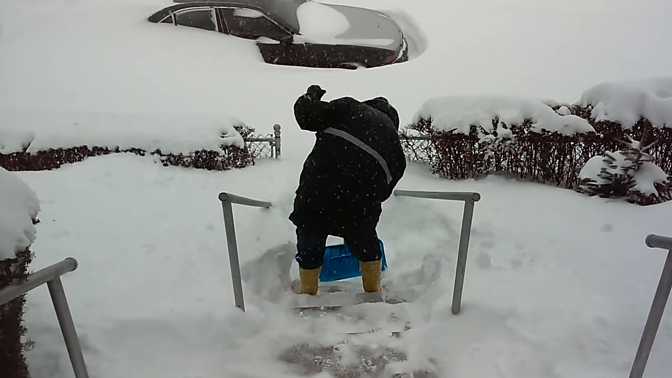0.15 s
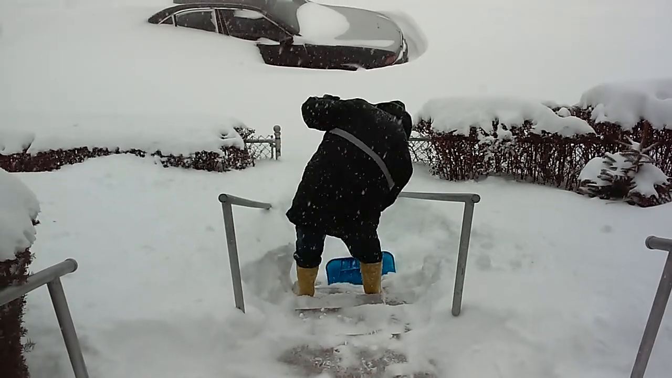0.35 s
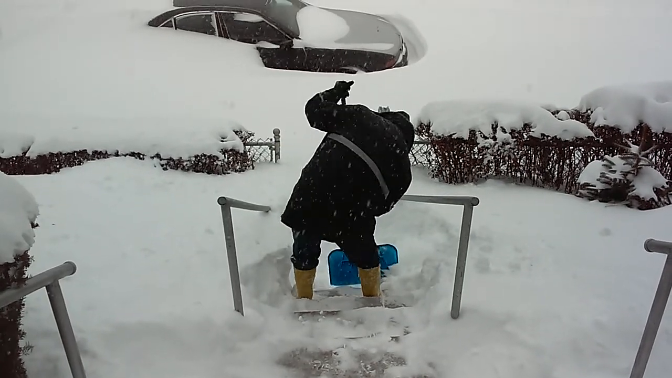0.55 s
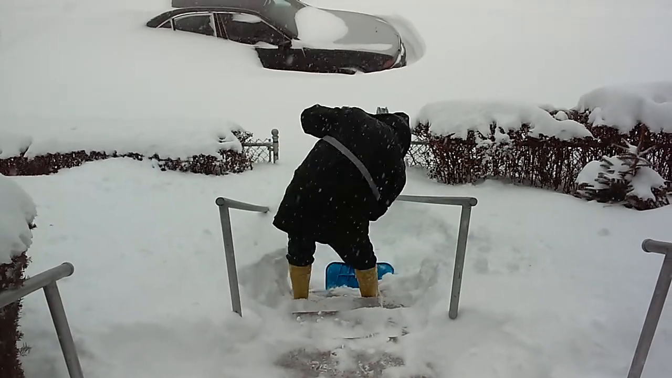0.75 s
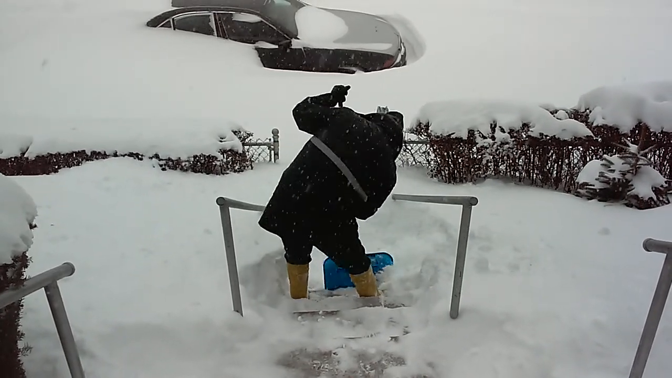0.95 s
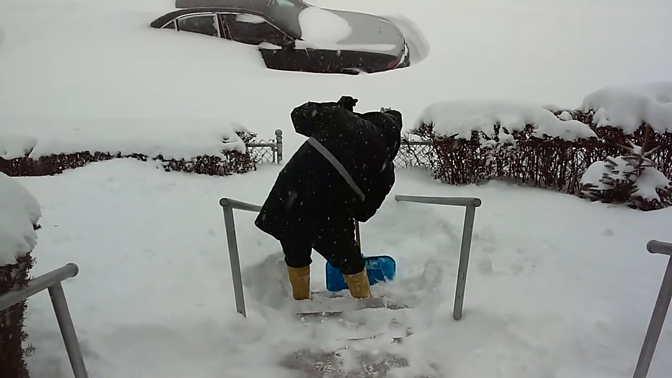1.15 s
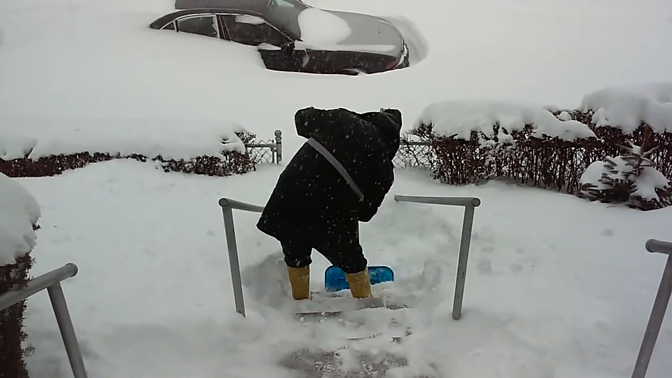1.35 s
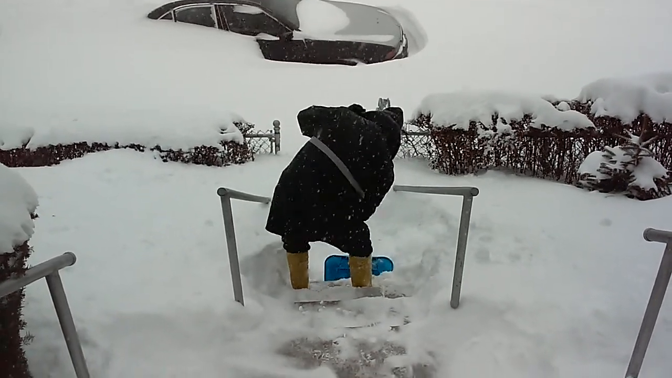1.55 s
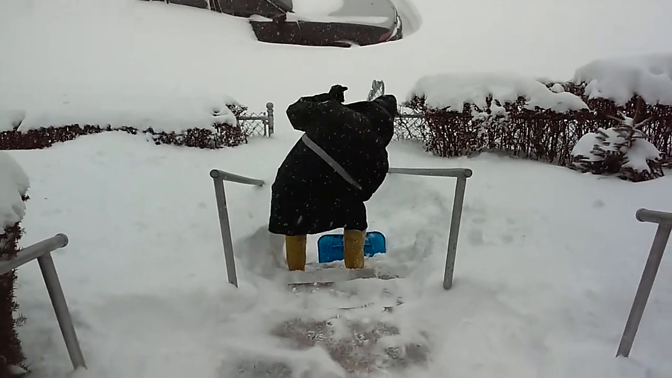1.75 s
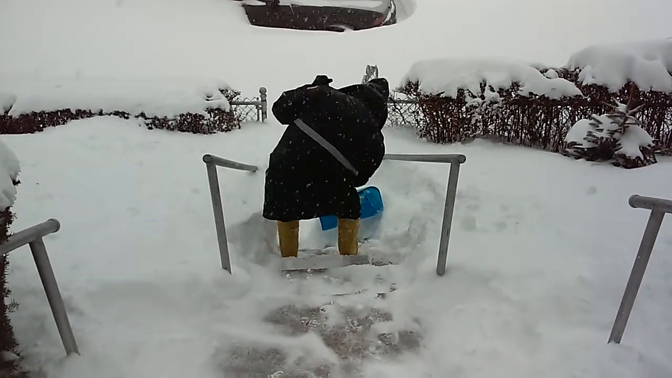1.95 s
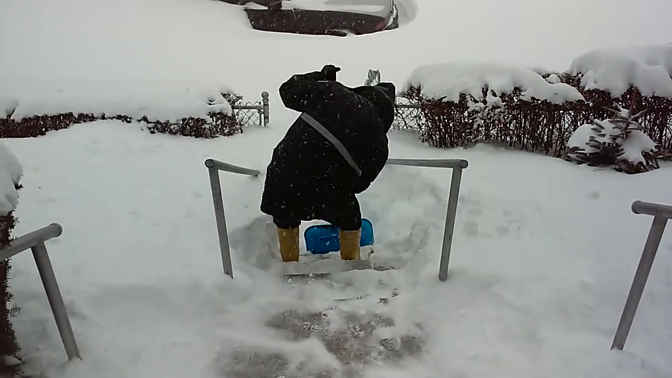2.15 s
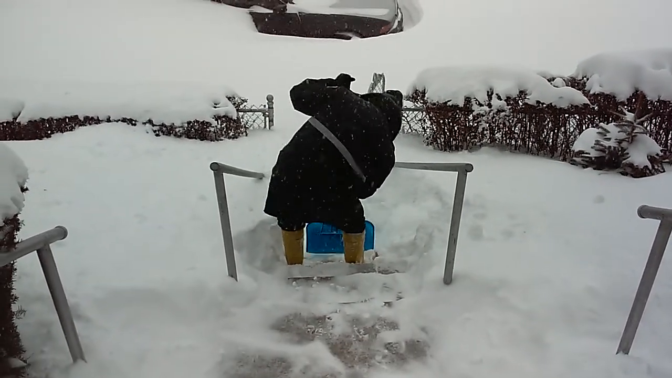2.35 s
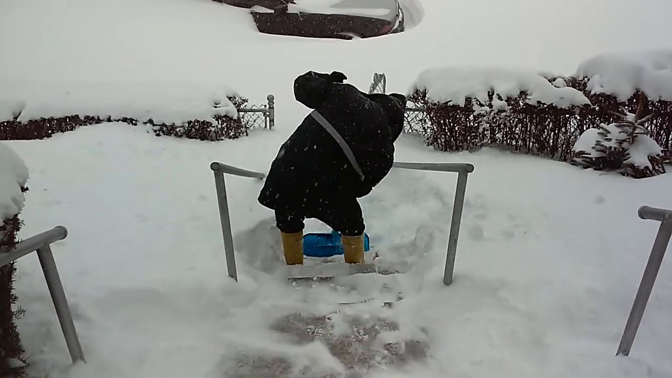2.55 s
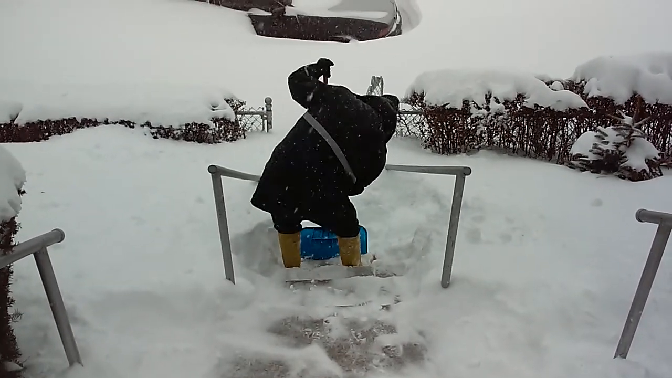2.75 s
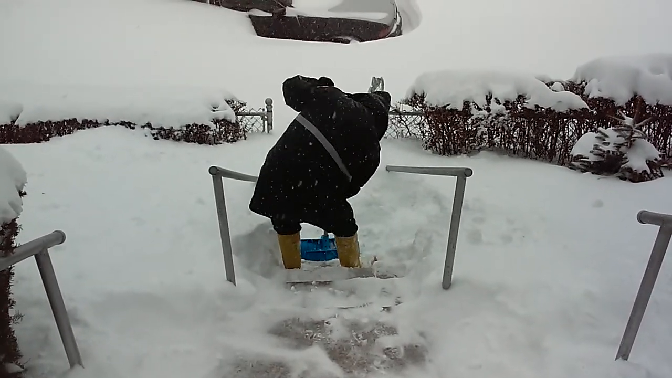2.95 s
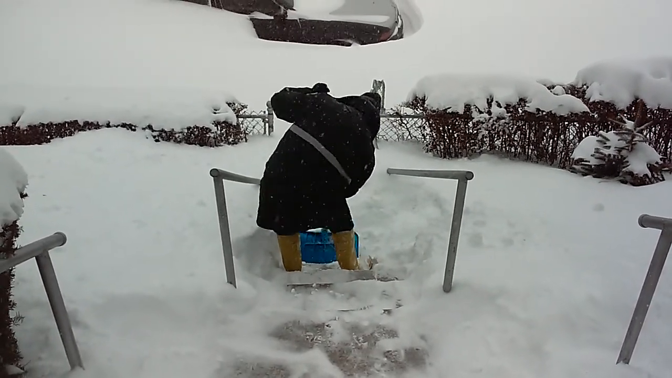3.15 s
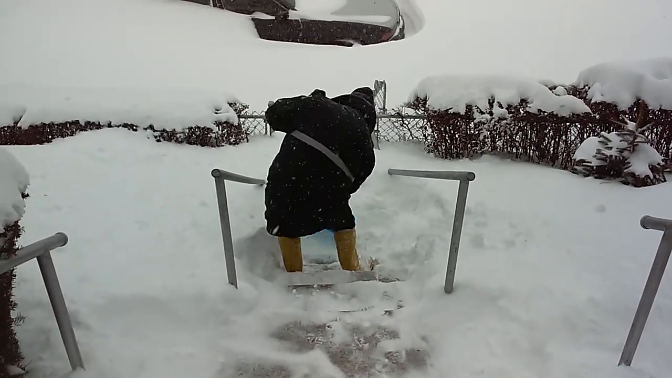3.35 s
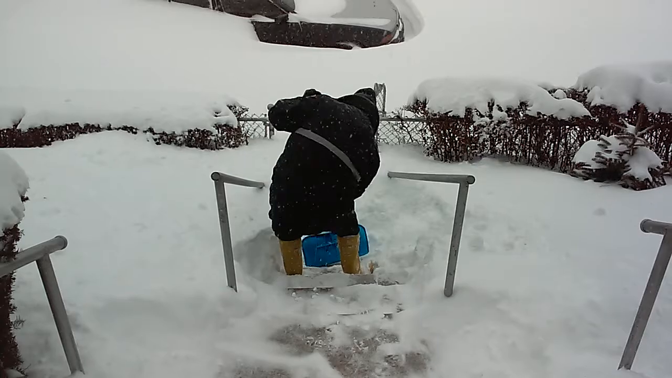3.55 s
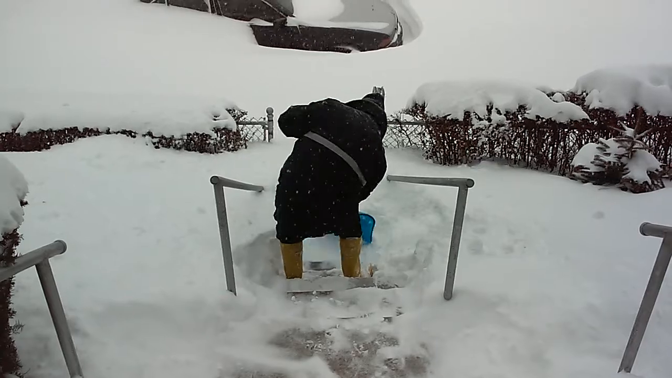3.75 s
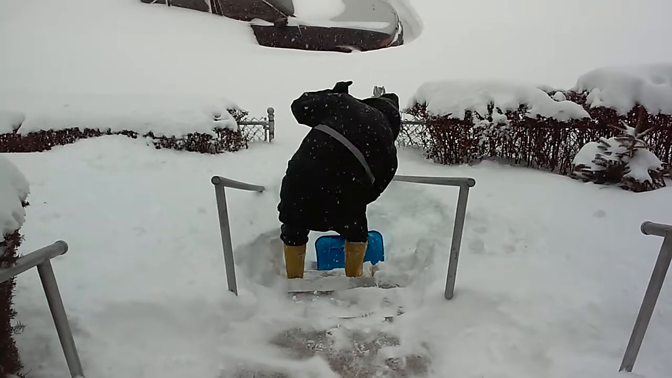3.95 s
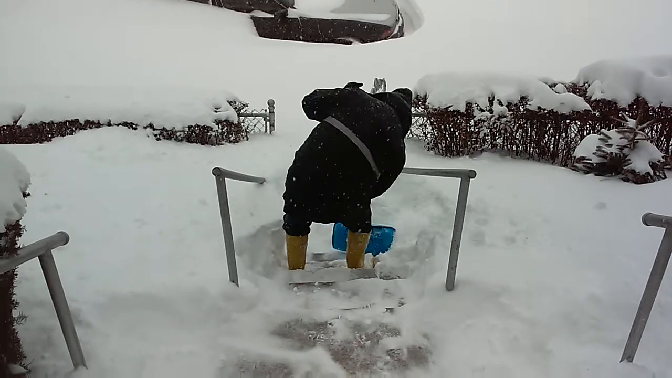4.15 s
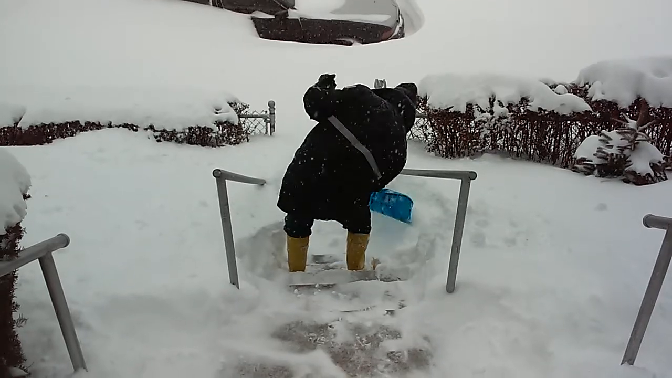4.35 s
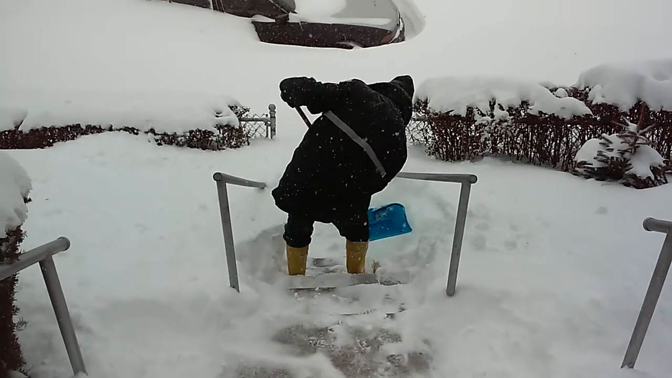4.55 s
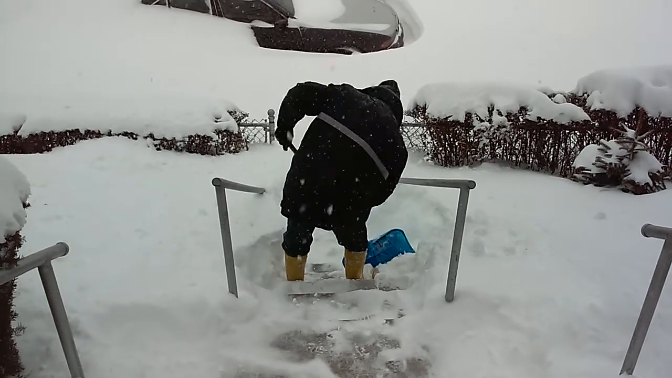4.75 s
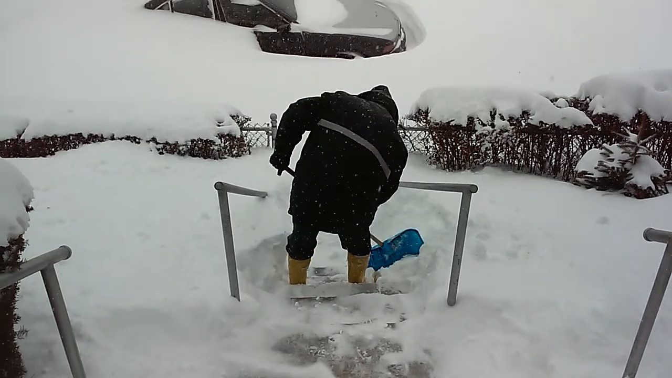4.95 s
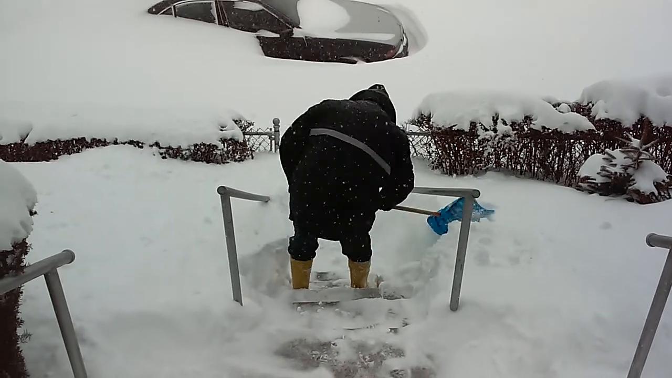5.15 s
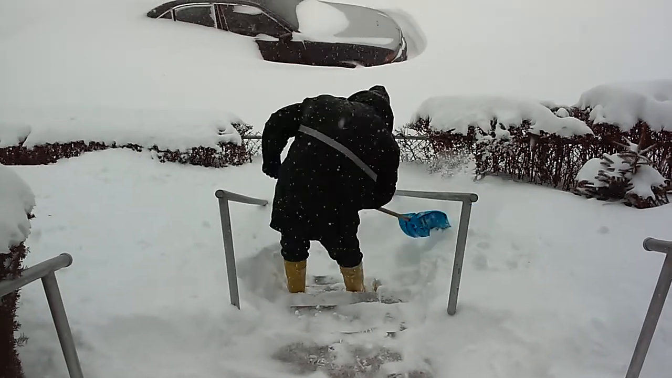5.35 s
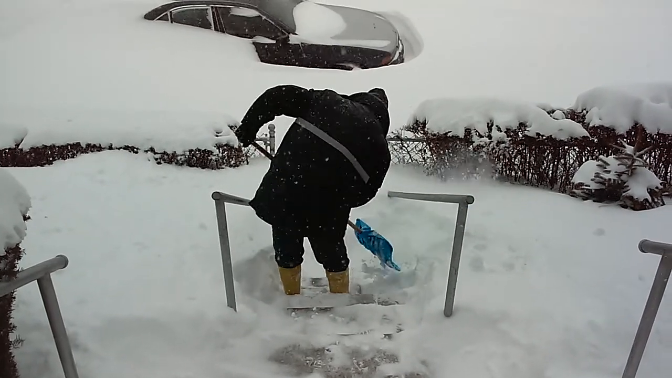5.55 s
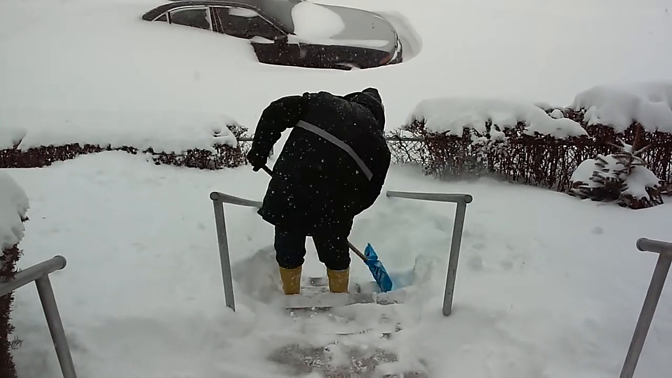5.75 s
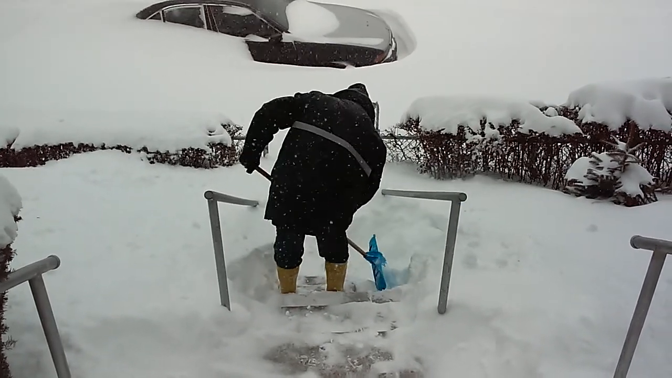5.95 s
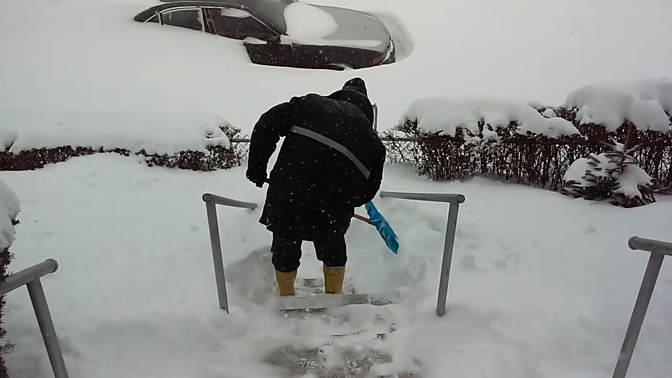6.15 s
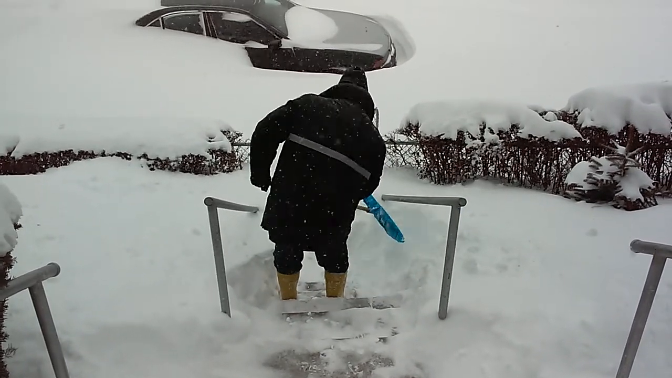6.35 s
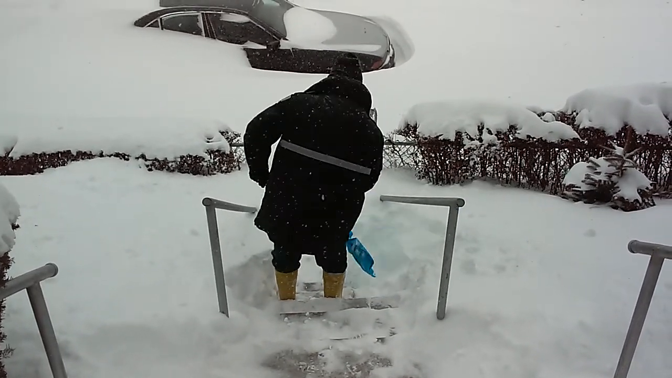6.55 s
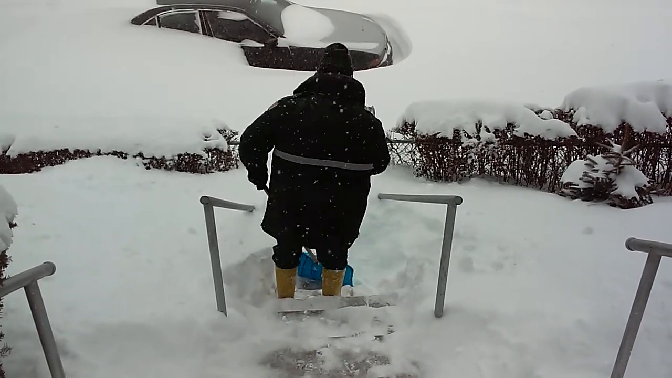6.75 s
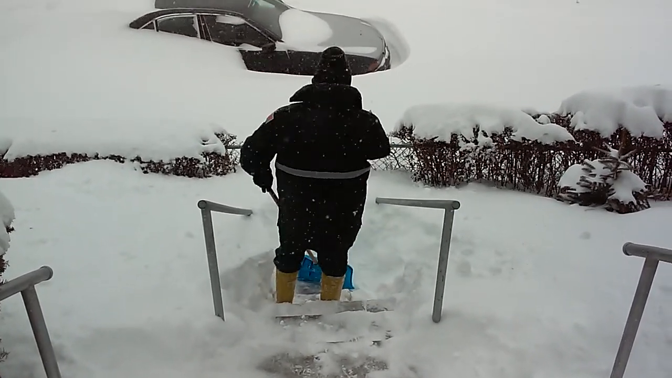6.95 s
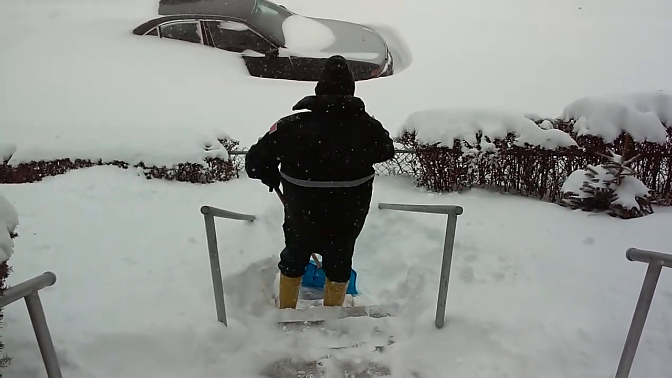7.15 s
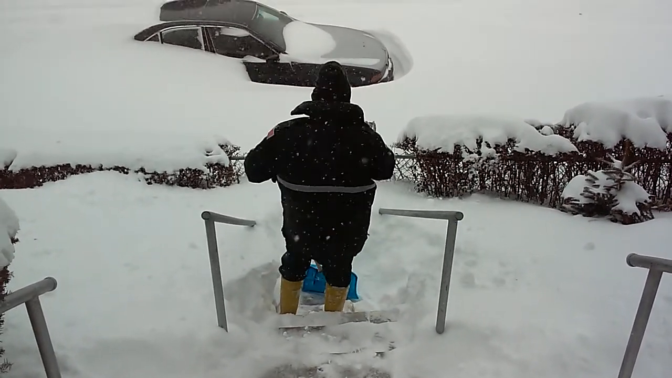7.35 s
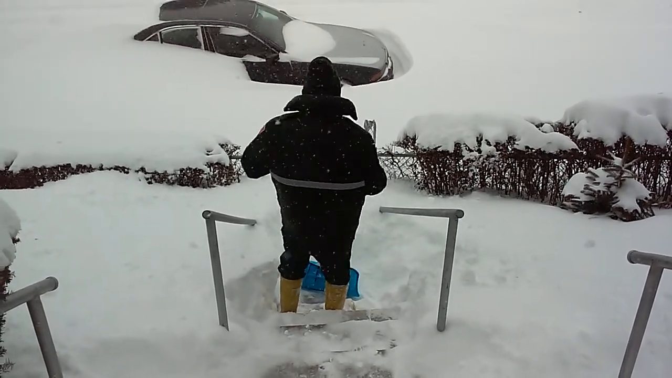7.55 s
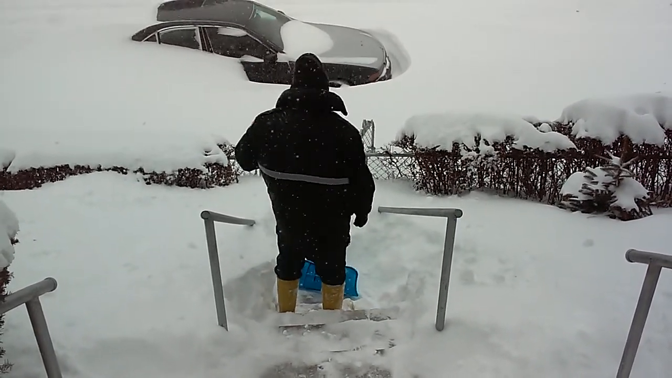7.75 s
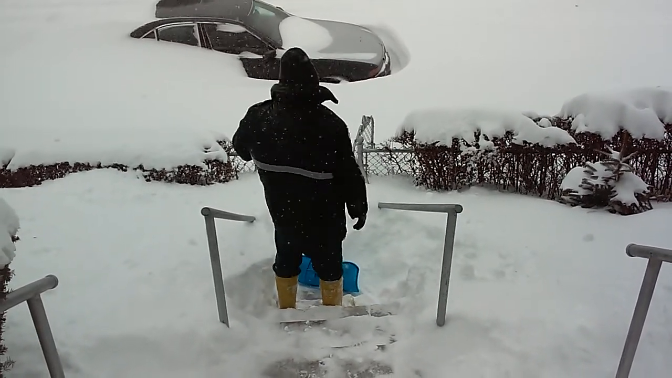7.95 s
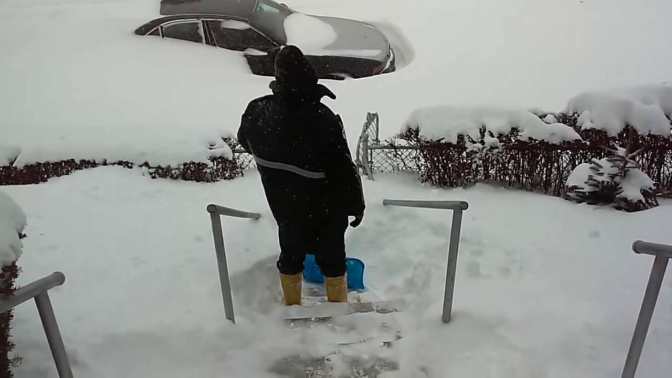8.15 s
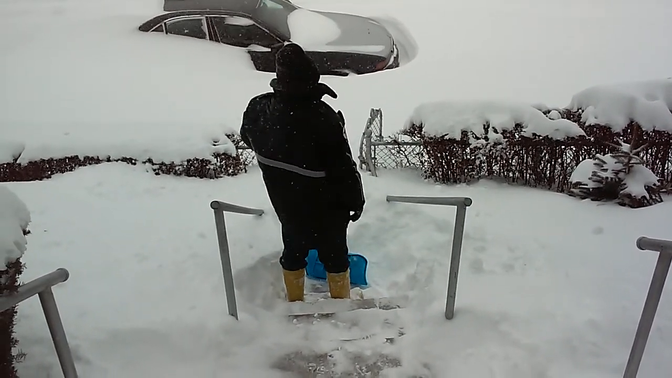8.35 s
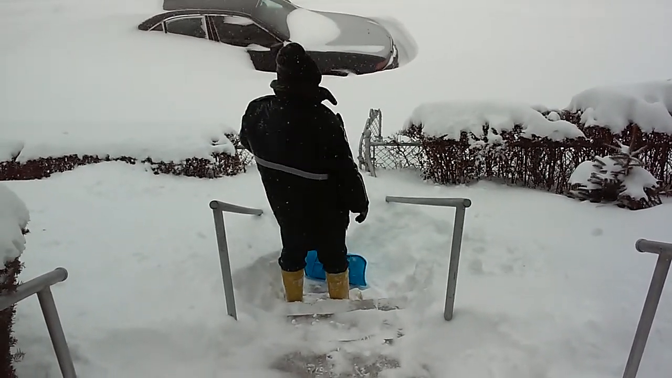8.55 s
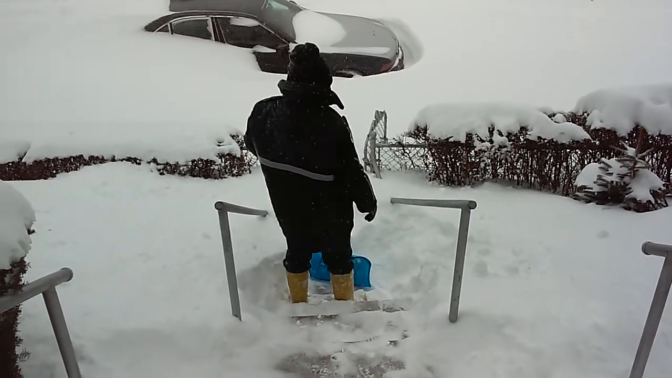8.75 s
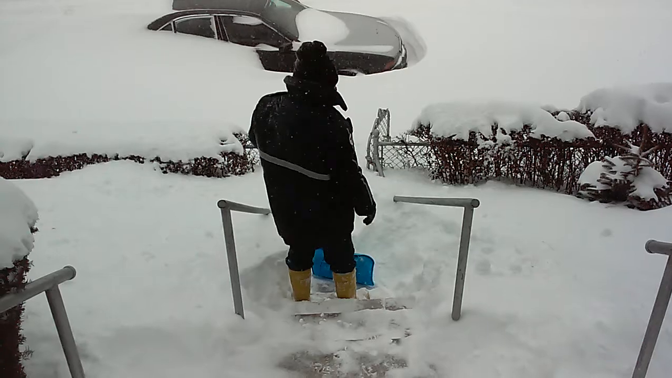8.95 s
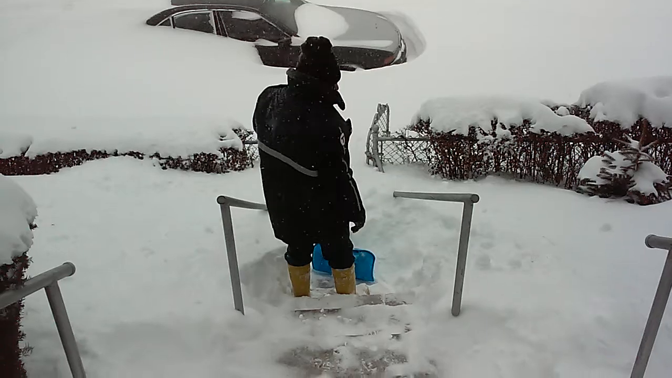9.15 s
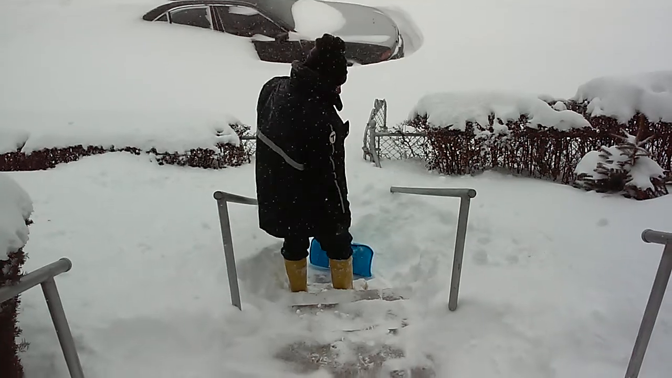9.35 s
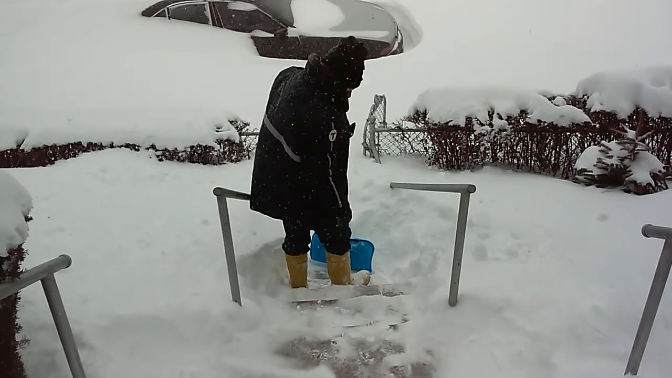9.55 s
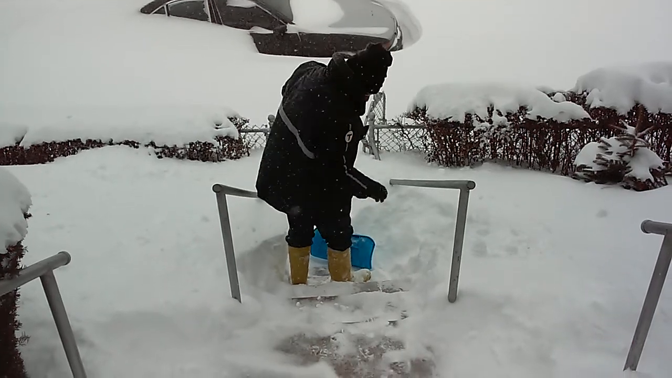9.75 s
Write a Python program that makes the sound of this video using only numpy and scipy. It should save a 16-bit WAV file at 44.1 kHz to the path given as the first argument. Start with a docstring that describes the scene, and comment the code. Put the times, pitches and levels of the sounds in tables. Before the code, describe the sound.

A plastic shovel thumps, crunches and scrapes through packed snow on outdoor steps in irregular strokes, then stops, leaving jacket rustle and faint distant hum.

```python
"""From the start a plastic shovel chops and scrapes packed snow off outdoor steps, for about 7 s: blows ring
low scoop modes as thumps, grain noise under the edge crunches, rasps in blade modes and snaps, plastic squeaks.
All along nylon hiss swells with coat and loose snow, over filtered traffic noise and a hum of wavering sines.
From 4.5 s puffs of low noise touch the microphone. After the last stroke coat and sifting snow stay in front,
with one faint squeak and one faint tick. House fronts return a weak echo of the shovel."""
import sys
import numpy as np
from scipy import signal
from scipy.fft import rfft, irfft, next_fast_len
from scipy.io import wavfile
from scipy.ndimage import uniform_filter1d, map_coordinates

SR = 44100
rng = np.random.default_rng(int(sys.argv[2]) if len(sys.argv) > 2 else 0)


def file_out(sig):
    """Save sig as 16-bit WAV at sys.argv[1]."""
    # one column per channel
    cols = np.atleast_2d(sig).T
    # limit, then scale
    lim = np.clip(cols, -1, 1)
    pcm = np.round(lim * 32767).astype(np.int16)
    wavfile.write(sys.argv[1], SR, pcm)


N = 431719

# Modes of scoop and shaft. Each row: frequency in Hz, relative level in dB, undamped t60 in s.
SCOOP_MODES = [(124.3, -14, 0.12), (174, -10.5, .18), (234.5, -11.5, 0.15), (263, -20.5, 0.18),
               (295, -13, 0.17), (397, -20.5, 0.095), (584, -17, 0.068), (702, -25.5, 0.037),
               (901, -25.5, 0.091), (1402, -31, 0.074), (2030, -36.5, 0.078)]
# The blade cuts through snow and strikes the step once. Each row: blow in s, thump level in dB,
# clack level in dB, pitch factor of the push, crunch level in dB on the way in.
CHOPS = [(.066, -6.5, -27.5, 0.95, -42), (.755, -29.5, -42, .55, -50), (.8319, -1, -20.5, 1.05, -24),
         (1.076, -19.5, -33, .56, -29), (1.1434, 1, -17, 0.9, -21.5), (1.4329, 1.5, -18.5, 0.94, -25.5),
         (1.601, -17.5, -43.5, .76, -45), (1.806, -11.5, -41.5, 1.1, -38.5),
         (2.3545, -2.5, -23, 0.83, -29.5), (2.6862, -2, -24, 1, -25), (3.647, -12, -32, 0.97, -64),
         (3.733, -17, -23.5, 1.13, -42.5), (4.16, -13, -45, 0.79, -38.5), (5.801, -25, -40.5, 0.72, -44.5),
         (6.7684, -19.5, -37.5, 0.81, -52)]


def amp(db):
    """Decibels to gain."""
    return 10 ** (np.asarray(db) / 20)


def unit(x):
    """x at rms 1."""
    return x / np.sqrt(np.mean(x ** 2) + 1e-20)


def clock():
    """The time of every sample in s."""
    return np.arange(N) / SR


def along(points, hz):
    """(Hz, value) points interpolated on a log frequency axis."""
    f, v = np.transpose(points)
    return np.interp(np.log(hz + 1), np.log(f), v)


def wobble(rate_hz):
    """A smooth random curve, rate_hz knots a second."""
    knots = rng.standard_normal(int(N * rate_hz / SR) + 4)
    steps = np.arange(8 * len(knots)) / 8
    return np.interp(clock() * rate_hz, steps, map_coordinates(knots, [steps]))


def filtered(x, response):
    """x times a response of frequency."""
    m = next_fast_len(N + SR // 2)
    return irfft(rfft(x, m) * response(np.fft.rfftfreq(m, 1 / SR)), m)[:N]


def coloured(x, spectrum):
    """x given a (Hz, dB) spectrum, at rms 1."""
    return unit(filtered(x, lambda hz: amp(along(spectrum, hz))))


def resonance(modes, f):
    """Complex response of each (Hz, width Hz, dB) mode, one row a mode."""
    centre, width, db = np.transpose(modes)[:, :, None]
    return amp(db) * 1j * f * width / (centre ** 2 - f * f + 1j * f * width)


def resonate(x, modes):
    """x rings a set of modes; white noise keeps its power."""
    return filtered(x, lambda f: unit(np.abs(resonance(modes, f).sum(0))))


def grains(rate_hz, spread_db, bed):
    """Tiny fractures of uneven size at random times over a bed of friction noise; rms 1."""
    sizes = amp(spread_db * np.clip(rng.standard_normal(N), -2, 2)) * rng.choice([-1, 1], N)
    fractures = unit(sizes * (rng.random(N) < rate_hz / SR))
    return unit(fractures + bed * rng.standard_normal(N))


def patchy(x, depth_db):
    """x with a drifting colour: patches of random gain, some hundred Hz wide and a tenth of a second long."""
    z = signal.stft(x, nperseg=512)[2]
    field = uniform_filter1d(rng.standard_normal(z.shape), size=8, axis=0)
    field = uniform_filter1d(field, size=22, axis=1)
    return unit(signal.istft(z * amp(depth_db * unit(field)), nperseg=512)[1][:N])


def add(track, s, sound):
    """Lay a sound into a track at time s."""
    part = track[max(round(s * SR), 0):][:len(sound)]
    part += sound[:len(part)]


def shovel(stick_db=2.0, flex_db=-6, mode_spread_db=3):
    """Snow crystals break in clumps under the edge; the same jolts ring the blade and flex the scoop."""
    # Spectrum of breaking snow. Each row: frequency in Hz, relative level in dB per Hz.
    crunch_spectrum = [(1500, -18), (3500, -13.5), (5300, -20.5), (6600, -10), (8800, -8.5), (9900, 0.5),
                       (11200, 0.5), (12200, 6.5), (13200, 4.5), (14200, 1.5), (15700, -7.5)]
    # Stiff modes of the blade. Each row: frequency in Hz, width in Hz, level in dB before tilt and scatter.
    blade_modes = [(413, 20, -4), (614, 41, 4), (704, 92, 5), (878, 63, 6), (960, 83, 2.5), (1128, 70, -1),
                   (1330, 60, -4), (1430, 100, 0), (1720, 80, -5), (1910, 90, -4.5), (2053, 37, -6),
                   (3064, 95, -8), (3325, 154, -2.5), (3600, 140, -4.5), (3980, 93, -8), (4330, 53, -13),
                   (6830, 1600, -13.5)]
    snow, jolts, rasp = np.zeros((3, N))
    blows = knocks()
    stick_slip = amp(stick_db * wobble(200))
    crystals = stick_slip * coloured(grains(rate_hz=3600, spread_db=4.0, bed=0.55), crunch_spectrum)
    catches = stick_slip * grains(rate_hz=900, spread_db=4.0, bed=0.38)
    modes = resonance(blade_modes, np.fft.rfftfreq(SR // 2, 1 / SR))
    octaves = np.log2(np.transpose(blade_modes)[0])
    for s, force, crunch_gain, rasp_gain, tilt in edge_force(blows):
        drive = rasp_gain * pressed(force, catches, s)
        # the point of contact decides which modes answer; the tilt of each contact favours high or low ones
        scatter_db = mode_spread_db * rng.standard_normal(len(blade_modes))
        body = amp(tilt * octaves + scatter_db) @ modes
        body /= np.sqrt(np.mean(np.abs(body) ** 2))
        add(rasp, s, irfft(rfft(drive) * body))
        add(jolts, s, drive * amp(-2 * max(tilt, 0)))
        add(snow, s, crunch_gain * pressed(force, crystals, s))
    flex = resonate(jolts, [(hz, 30, db) for hz, db, _ in SCOOP_MODES])
    return snow + rasp + amp(flex_db) * flex + thumps(blows)


def knocks(slip_loss_db=1.26, slip_scatter_db=1.36, slip_scatter_s=0.00131):
    """All blows in time order (s, thump dB, clack dB, pitch): one a chop, an uneven fading train a judder."""
    # The edge catches and stutters over the step. Each row: start in s, number of slips, gap between slips in s,
    # thump and clack levels in dB before scatter and loss per slip, pitch factor of the push.
    judders = [(1.018, 2, 0.021, -22, -51.5, 0.56), (1.2975, 4, .022, -13, -43, 0.67),
               (1.8272, 8, 0.016, 2.5, -27.5, 0.79), (2.563, 2, 0.012, -4, -15, 1),
               (2.7707, 3, .017, -2, -25, .85), (3.2079, 4, 0.017, -1, -25.5, 0.78),
               (4.1838, 3, .0205, -0.5, -25.5, 0.72), (4.912, 2, 0.017, -18.5, -47.5, 0.84),
               (4.995, 3, 0.018, -16, -39.5, 0.8), (5.838, 3, .0178, -14.5, -38.5, 0.82)]
    blows = [(s, thump_db, clack_db, pitch) for s, thump_db, clack_db, pitch, _ in CHOPS]
    for s, slips, gap_s, thump_db, clack_db, pitch in judders:
        for k, (late, size) in enumerate(rng.standard_normal((round(slips), 2))):
            db = slip_scatter_db * size - slip_loss_db * k
            slip_s = s + k * gap_s + slip_scatter_s * late * (k > 0)
            blows.append((slip_s, thump_db + db, clack_db + db, pitch))
    return sorted(blows)


def thumps(blows, push_hz=225, push_delay_s=0.0038, push_cycles=0.64, ring_db=0, build_s=0.0032,
           choke_t60_s=0.039, settle_s=0.042, lowest_hz=66):
    """A blow shoves the scoop once and rings its low modes until snow or the next contact damps them."""
    out, t = np.zeros(N), np.arange(SR // 4) / SR
    hz, level_db, t60 = np.transpose(SCOOP_MODES)[:, :, None]
    gaps_s = np.diff([row[0] for row in blows], append=N / SR)
    for (s, db, _, pitch), gap_s in zip(blows, gaps_s):
        # the snow load differs every time
        size, detune = rng.standard_normal((2, len(SCOOP_MODES), 1))
        cycles = push_hz * pitch * (t - push_delay_s)
        push = np.cos(2 * np.pi * cycles) * np.exp(-(cycles / push_cycles) ** 2)
        push *= 1 - np.exp(-t / 0.00029)
        decay = amp(level_db + 2 * size - 60 * t / t60)
        ring = decay * np.sin(2 * np.pi * hz * (1 + detune / 50) * t)
        choke = amp(-60 * np.maximum(t - min(gap_s, settle_s), 0) / choke_t60_s)
        free = (1 - np.exp(-t / build_s)) * choke
        add(out, s, amp(db) * (push + amp(ring_db) * free * ring.sum(0)))
    # so small a scoop radiates no deep bass
    return signal.sosfilt(signal.butter(2, lowest_hz, "high", fs=SR, output="sos"), out)


def strokes(entry_rise_s=0.047, entry_fall_s=0.03, entry_rasp_db=-11.5, entry_tilt=6.1):
    """The scrapes, and the short crunch that leads into each chop (its rasp relative to crunch)."""
    # Pushes of the edge through snow. Each row: peak in s, rise in s, fall in s (both to -20 dB),
    # crunch level in dB, rasp level in dB, rasp tilt in dB per octave.
    scrapes = [(.51, .11, .09, -41, -46, 8.5), (1.362, .063, 0.067, -26, -34.5, 3),
               (1.865, .03, 0.05, -29.5, -30, 2), (1.912, .025, .025, -22.5, -29, 2.5),
               (1.957, .08, .056, -21, -27.5, 1), (1.984, .048, .049, -14, -44, 3),
               (2.375, .04, 0.16, -36, -47, -2.5), (2.596, .014, 0.025, -22, -27.5, 0),
               (2.81, .04, 0.03, -30, -30.5, -2), (2.894, .044, 0.078, -25, -26, 0.5),
               (2.97, .065, 0.036, -30.5, -40.5, 11.5), (3.154, .025, 0.081, -31, -40.5, 6.5),
               (3.225, .014, 0.025, -12, -15.5, 3), (3.266, .012, .03, -17, -21.5, 2),
               (3.305, .03, 0.11, -21.5, -46.5, 17), (3.731, .011, 0.031, -6.5, -19, 1.5),
               (3.79, .05, 0.052, -32, -43, -2.5), (4.252, .07, .06, -25, -35, 3.5),
               (4.335, .04, .28, -26, -43.5, 3), (5.02, .095, 0.064, -32.5, -31.5, 1.5),
               (5.133, .025, .11, -17.5, -36, 3), (5.863, .036, 0.038, -18, -23, -1),
               (6.144, .05, 0.085, -23.5, -32.5, 6.5), (6.229, .087, 0.047, -31, -39, 1),
               (6.774, 0.0064, .13, -39, -37.5, -2), (6.842, .022, .034, -23.5, -36, 7.5)]
    entries = [(s, entry_rise_s, entry_fall_s, db, db + entry_rasp_db, entry_tilt) for s, *_, db in CHOPS]
    return [*scrapes, *entries]


def edge_force(blows, shape=0.98, clack_t60_s=0.012, rattle_db=-20, rattle_t60_s=0.3, snap_t60_s=0.011,
               clack_tilt=-1, crack_tilt=4):
    """Every contact of the edge: (start s, force over time, crunch gain, rasp gain, tilt dB per octave)."""
    # The icy crust snaps. Each row: start in s, length before the fade in s, crunch level in dB, rasp level in dB.
    cracks = [(0.071, .004, -29, -43.5), (0.759, .0075, -38, -39), (.812, .005, -27, -44),
              (1.0173, 0.011, -32.5, -51), (1.26, 0.0054, -32, -40), (1.298, .013, -31, -46.5),
              (1.947, 0.00066, -11.5, -27), (2.5633, 0.0074, -23.5, -17.5), (2.7517, 0.0074, -26.5, -50),
              (3.256, .004, -17.5, -21), (3.651, .004, -26.5, -40.5), (3.687, 0.012, -33, -46),
              (3.827, 0.01, -28, -51.5), (4.17, 0.0052, -25, -34), (4.228, .003, -24.5, -35),
              (4.249, .005, -21.5, -29.5), (4.3106, .006, -8, -36), (4.756, .002, -18.5, -42),
              (5.1237, 0.0024, -11, -44), (5.137, .003, -14.5, -36), (5.7975, 0.0097, -21, -32.5),
              (6.1885, 0.0028, -9.5, -24.5), (9.049, .003, -38.5, -67)]
    t, contacts = np.arange(SR // 2) / SR, []
    for s, rise_s, fall_s, crunch_db, rasp_db, tilt in strokes():
        lead_s = min(s, 0.15)
        stroke = amp(-20 * np.abs((t - lead_s) / np.where(t < lead_s, rise_s, fall_s)) ** shape)
        contacts.append((s - lead_s, stroke, amp(crunch_db), amp(rasp_db), tilt))
    attack = 1 - np.exp(-t / 0.0003)
    for s, length_s, crunch_db, rasp_db in cracks:
        snap = attack * amp(-60 * np.maximum(t - length_s, 0) / snap_t60_s)
        contacts.append((s, snap, amp(crunch_db), amp(rasp_db), crack_tilt))
    # a blow is a hard clack, then a weak rattle of loose snow on the blade
    rattle = amp(rattle_db - 60 * t / rattle_t60_s)
    clack = attack * (2.6 * amp(-60 * t / clack_t60_s) + rattle)
    for s, _, clack_db, _ in blows:
        contacts.append((s + 0.0013, clack, amp(clack_db - 6.5), amp(clack_db), clack_tilt))
    return contacts


def pressed(force, texture, s):
    """The texture from time s on under a force; the force alone sets the energy."""
    drive = force * np.resize(texture[max(round(s * SR), 0):][:len(force)], len(force))
    return drive * np.sqrt(np.sum(force ** 2) / np.sum(drive ** 2))


def squeaks(relative_width=0.11):
    """Plastic catches on ice and one resonance stands out: short unsteady squeaks or hollow rings."""
    # Each row: peak in s, half length in s, frequency in Hz, rms level at the peak in dB.
    squeak_tones = [(.073, .0053, 890, -30), (1.155, 0.0098, 1890, -27.5), (1.845, 0.018, 676, -20),
                    (1.962, .028, 894, -30.5), (2.571, 0.0054, 3270, -18.5), (2.9, .015, 3480, -30),
                    (3.237, 0.027, 409, -21), (3.637, 0.015, 3190, -53), (3.742, .016, 946, -22.5),
                    (6.117, 0.021, 805, -39), (6.148, 0.012, 970, -31.5), (6.1902, 0.0018, 3600, -17),
                    (6.193, .0017, 4390, -16), (6.775, 0.0073, 1460, -34), (8.174, .012, 3340, -46),
                    (8.18, .008, 5000, -52)]
    out = np.zeros(N)
    t = np.arange(-SR // 10, SR // 10) / SR
    for s, half_s, hz, db in squeak_tones:
        width_hz = relative_width * hz
        # uneven slips make the phase wander, which widens the tone
        wander = np.cumsum(rng.standard_normal(len(t))) * np.sqrt(2 * np.pi * width_hz / SR)
        phase = 2 * np.pi * hz * t + uniform_filter1d(wander, int(SR / width_hz / 2) + 1)
        envelope = np.sqrt(2) * np.exp(-(t / half_s) ** 2)
        add(out, s + t[0], amp(db) * envelope * np.sin(phase))
    return out


def houses(x, onset_s=0.016):
    """House fronts return a weak echo: x convolved with noise that fades at its own rate in each band."""
    # Colour of the echo. Each row: frequency in Hz, relative level in dB.
    echo_colour = [(80, -7.5), (180, -5), (280, 0.5), (400, 4.5), (600, 1), (1000, 5), (2200, 6.5),
                   (4000, 1), (12000, 2)]
    # Fade of the echo. Each row: frequency in Hz, t60 in s.
    echo_t60 = [(150, 0.78), (500, 0.82), (2000, 0.48), (12000, 0.58)]
    hz, t, z = signal.stft(rng.standard_normal(SR), SR, nperseg=256)
    fade = amp(-60 * t / along(echo_t60, hz)[:, None]) * (1 - np.exp(-t / onset_s))
    tail = signal.istft(z * fade, SR, nperseg=256)[1]
    echo = signal.fftconvolve(x, tail / np.linalg.norm(tail))[:N]
    return filtered(echo, lambda f: amp(along(echo_colour, f)))


def swell(s, rise_s, fall_s, db, shape=1.42):
    """A gain that peaks at time s, 20 dB down one rise earlier and one fall later; shape 1 pointed, 2 rounded."""
    t = clock() - s
    return amp(db - 20 * np.abs(t / np.where(t < 0, rise_s, fall_s)) ** shape)


def swish(flutter_db=1.04, sift_db=-54):
    """Nylon sleeves rub and powder snow sifts: a fine, bright hiss swells over a steady floor of sift_db."""
    # Movements of the coat and slides of loose snow. Each row: peak in s, rise in s, fall in s, level in dB.
    movements = [(.1, 0.12, .2, -39), (.51, 0.15, .13, -35.5), (.92, 0.13, .25, -39.5),
                 (1.25, .15, .2, -38.5), (1.7, .33, .4, -35), (2.1, 0.12, .2, -41), (2.82, 0.11, .13, -35),
                 (3.35, .15, .15, -35.5), (3.84, .1, .27, -37.5), (4.38, .13, .3, -31),
                 (4.8, 0.18, .3, -34.5), (5.1, 0.52, .35, -32.5), (5.75, 0.56, .27, -42.5),
                 (6.25, .15, .25, -42), (7.04, 0.32, .16, -41.5), (7.8, 0.35, .6, -35.5),
                 (8.62, 0.35, .45, -46), (9.79, 0.38, .2, -47)]
    # Spectrum of the hiss. Each row: frequency in Hz, relative level in dB per Hz.
    nylon_spectrum = [(200, -18.5), (700, -8), (1500, -19), (2600, -21.5), (3700, -19.5), (5200, -23.5),
                      (7000, -14.5), (9000, -9), (10500, -4), (12600, 0.5), (14200, -4), (15700, -6)]
    level = np.sqrt(amp(sift_db) ** 2 + sum(swell(*row) ** 2 for row in movements))
    rubbing = coloured(grains(rate_hz=4900, spread_db=12, bed=1.8), nylon_spectrum)
    return level * amp(flutter_db * wobble(45)) * patchy(rubbing, depth_db=1.94)


def wind():
    """Brief eddies rumble on the microphone: low noise in Gaussian puffs."""
    # Each row: peak in s, width in s, level in dB.
    puffs = [(4.5, 0.11, -49), (4.627, 0.013, -18.5), (4.66, 0.061, -40), (8.26, 0.023, -47.5),
             (8.88, 0.051, -51), (9.14, 0.062, -52), (9.615, 0.021, -37), (9.68, 0.05, -49)]
    # Spectrum of the rumble. Each row: frequency in Hz, relative level in dB per Hz.
    rumble_spectrum = [(15, -20), (45, 4.5), (90, 0.5), (160, -11), (300, -34), (1000, -76)]
    t = clock()
    gusts = sum(amp(db) * np.exp(-((t - s) / width_s) ** 2) for s, width_s, db in puffs)
    return gusts * coloured(rng.standard_normal(N), rumble_spectrum)


def street(drift_db=2, waver_hz=1.5, waver_db=2):
    """Far traffic as drifting filtered noise, with a machine's hum of sines wavering in pitch and level."""
    # Spectrum of traffic. Each row: frequency in Hz, relative level in dB per Hz.
    traffic_spectrum = [(20, -12), (45, -26.5), (70, -15.5), (110, 0), (160, -2.5), (270, -0.5), (380, -6),
                        (580, -5.5), (720, -11), (950, -9), (1400, -15), (2100, -22.5), (2700, -21),
                        (4200, -34), (16000, -50.5)]
    # Tones of the hum. Each row: mean frequency in Hz, relative level in dB.
    hum_tones = [(269, 0.5), (297, -4.5), (355, -13), (480, -11.5), (520, -9.5), (575, -12.5), (624, -10)]
    # Level curves, traffic before drift. Each row: time in s, level in dB.
    traffic_level = [(0, -57), (1, -52), (6.6, -54.5), (7.45, -59.5), (7.85, -50), (8.6, -49), (9.79, -52)]
    hum_level = [(0, -46.5), (.7, -54), (3.3, -45), (7.4, -54.5), (8.2, -49), (8.6, -61.5), (9.79, -52)]
    traffic_db = np.interp(clock(), *np.transpose(traffic_level))
    hum_db = np.interp(clock(), *np.transpose(hum_level))
    traffic_gain = amp(traffic_db + drift_db * wobble(4.6))
    traffic = traffic_gain * coloured(rng.standard_normal(N), traffic_spectrum)
    hum = np.zeros(N)
    for hz, db in hum_tones:
        gain = amp(db + waver_db * wobble(13))
        phase = 2 * np.pi * np.cumsum(hz + waver_hz * wobble(9.7)) / SR
        hum += gain * np.sin(phase)
    return traffic + amp(hum_db) * unit(hum)


def scene():
    """The shovel and its echo over coat, street and wind."""
    work = shovel()
    echo = amp(-20.5) * houses(work)
    return (work + echo + squeaks() + swish() + street() + wind())[None]


def record(dry, top=0.73, top_hz=15800):
    """Rounds off the loudest peaks towards top and keeps nothing from top_hz up."""
    held = dry[0] / (1 + np.abs(dry[0] / top) ** 6) ** (1 / 6)
    return filtered(held, lambda hz: hz < top_hz)[None]


dry = scene()
out = record(dry)
file_out(out)
```